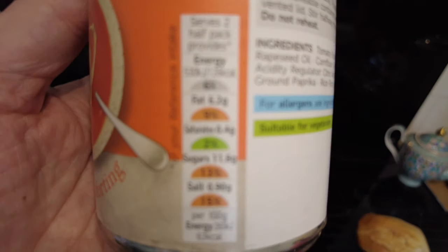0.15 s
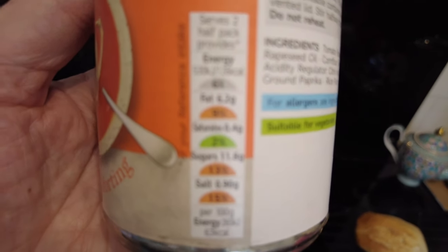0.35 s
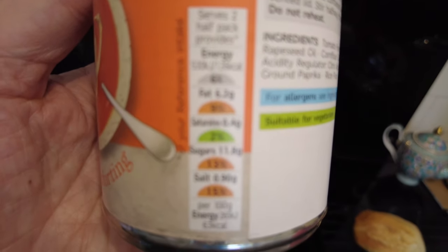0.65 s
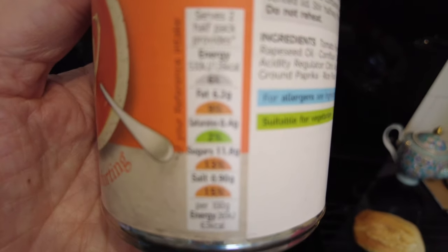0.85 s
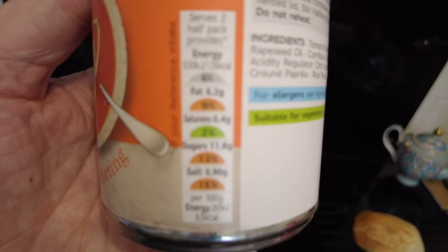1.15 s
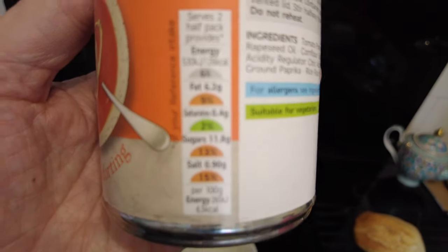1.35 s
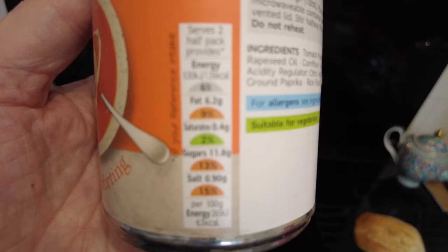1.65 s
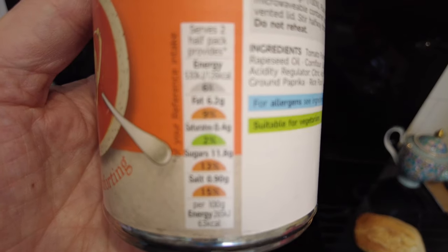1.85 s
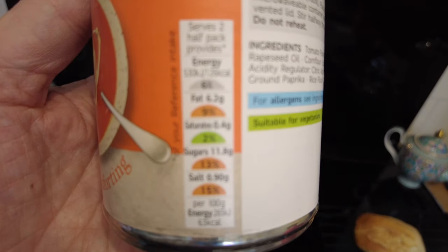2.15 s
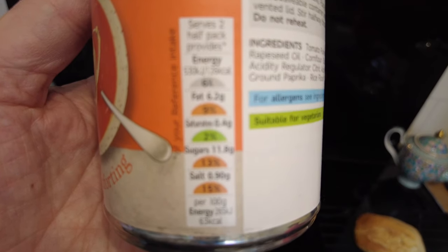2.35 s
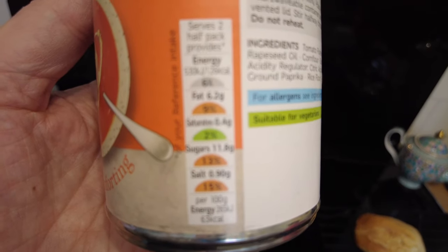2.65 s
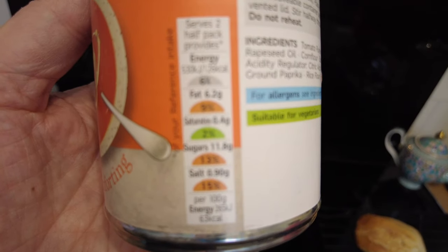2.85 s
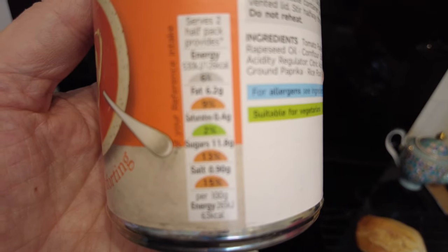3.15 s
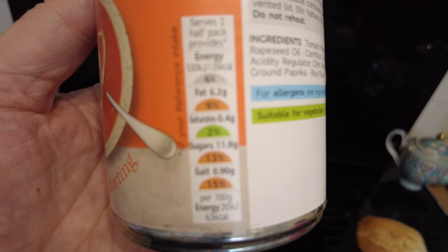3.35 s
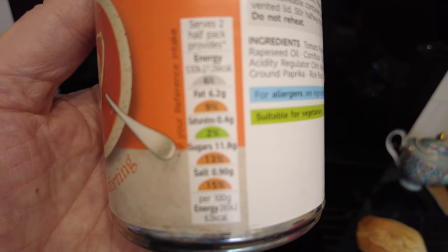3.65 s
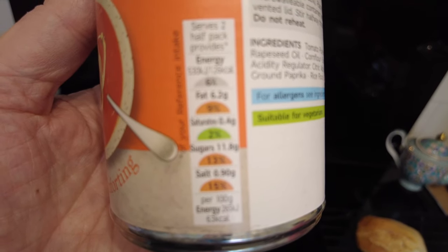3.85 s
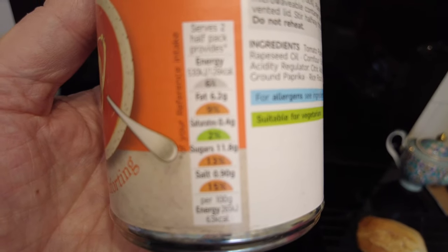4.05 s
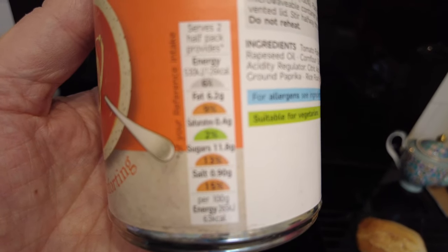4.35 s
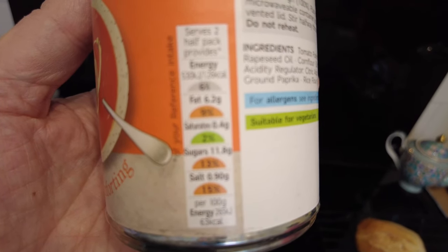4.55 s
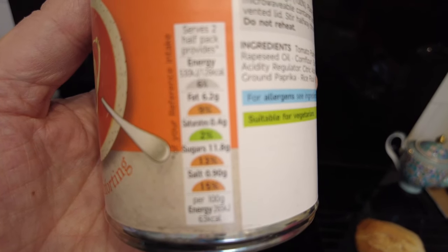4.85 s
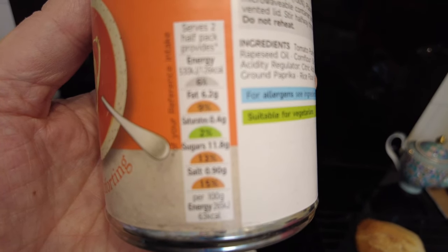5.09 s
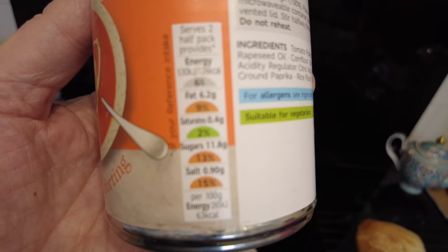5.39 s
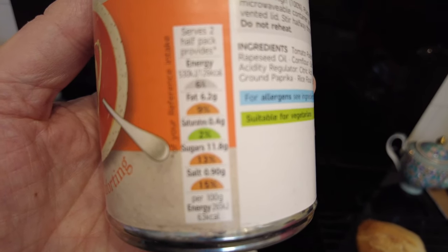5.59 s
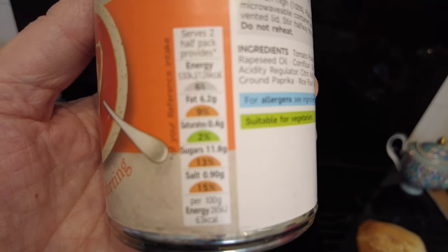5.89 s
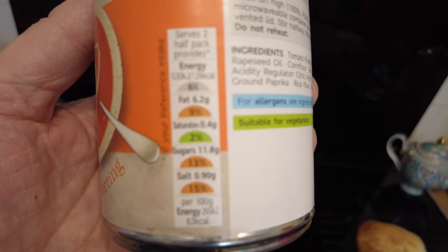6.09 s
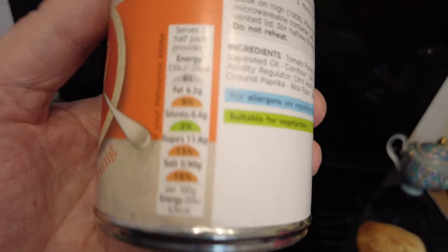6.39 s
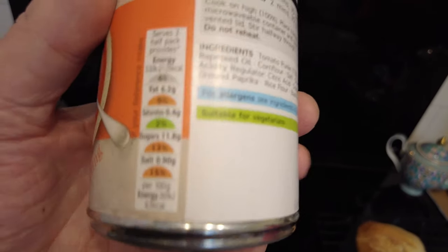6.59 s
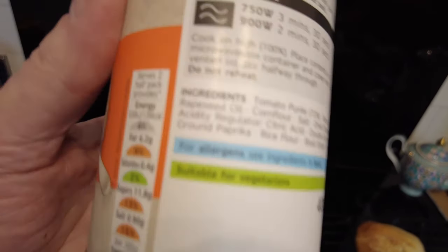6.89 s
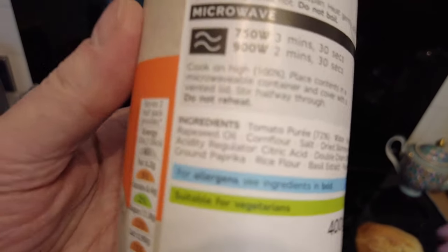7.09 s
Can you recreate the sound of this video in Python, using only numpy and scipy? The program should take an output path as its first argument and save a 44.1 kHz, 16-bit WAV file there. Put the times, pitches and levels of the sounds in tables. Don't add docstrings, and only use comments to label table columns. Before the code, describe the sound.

In a small kitchen, dull knocks and metallic clacks punctuate a constant low hum before a hand taps and rubs a labelled can.

```python
import sys
import numpy as np
from scipy import signal
from scipy.fft import rfft, irfft
from scipy.io import wavfile
from scipy.ndimage import uniform_filter1d

SR = 44100
rng = np.random.default_rng(int(sys.argv[2]) if len(sys.argv) > 2 else 0)


def volts_from_decibels(level):
    exponent = np.asarray(level, float) / 20
    return 10 ** exponent


def transcribe(signal):
    frames = np.atleast_2d(signal).T
    limited = np.clip(frames, -1, 1)
    pcm = np.round(limited * 32767).astype(np.int16)
    wavfile.write(sys.argv[1], SR, pcm)


N = 318843

# f/Hz, level/dB, t60/s
PLASTIC_MODES = [(1289, -3, .1), (1550, -1.5, .04), (1717, -5, .044), (3360, -9, .046), (4880, -14, .05),
                 (6230, -13, .08), (8030, -15, .09)]


def tin_taps():
    # t/s, blow level/dB, tilt/(dB per octave), ring level/dB, pitch f/Hz
    blows = [
        (5.798, -47, -7, 0.5, 1300),
        (6.0307, -51.5, -2, 6, 1290),
        (6.2527, -41, -9, 3, 1290),
        (6.512, -41.5, -4, -2, 1290),
        (6.62, -55, 2, 2, 1300),
        (6.815, -41.5, -5, -1, 2000),
    ]
    # f/Hz, level/dB, t60/s
    tin_modes = [(125, 14, .15), (1290, 0, .12), (2070, -8, .16), (3500, -20, .06), (4720, -17, .08),
                 (6220, -17, .08)]
    return struck(blows, tin_modes, low_slope=13.0, top_hz=7040, rise_ms=8.7, scrape_ms=12)


def drag():
    # peak t/s, level/dB, rise/s, fall/s
    lower_strokes = [
        (6.05, -75, .015, .03),
        (6.12, -61, 0.022, 0.048),
        (6.17, -60, .02, 0.045),
        (6.268, -54, 0.0068, 0.06),
        (6.63, -70, 0.016, .06),
    ]
    # peak t/s, level/dB, rise/s, fall/s
    upper_strokes = [
        (6.11, -56, .025, 0.063),
        (6.22, -63, 0.041, 0.062),
        (6.83, -56, 0.029, 0.03),
    ]
    width_hz = 10
    out, t = np.zeros(N), np.arange(N) / SR
    pole = np.exp(-np.pi * width_hz / SR)
    for hz, strokes in ((1290, lower_strokes), (2070, upper_strokes)):
        drift = signal.lfilter([1], [1, -pole], rng.standard_normal((N, 2)) @ [1, 1j])
        envelope = 1.9 + drift / np.std(drift)
        tone = (envelope * np.exp(2j * np.pi * hz * t)).real
        out += swells(strokes) * evened(tone)
    return out


def snap():
    # t/s, level/dB, f/Hz, width/ms
    releases = [
        (6.5238, -24.5, 5830, 0.26),
    ]
    out, t = np.zeros(N), np.arange(-60, 60) / SR
    for s, db, hz, width_ms in releases:
        pair = np.sin(2 * np.pi * hz * t) + 1.1 * np.sin(2 * np.pi * 1.52 * hz * t)
        add(out, s, volts_from_decibels(db) * np.exp(-(1000 * t / width_ms) ** 2) * pair)
    return out


def slide():
    strokes = [
        (6.13, -89, 0.046, .06),
        (6.5, -45.5, 0.091, 0.09),
        (6.82, -58.5, 0.021, 0.041),
        (7.01, -52.5, 0.036, 0.13),
    ]
    # f/Hz, level/(dB per Hz)
    skin_spectrum = [(1000, -18), (3000, -10), (6500, -7.5), (11500, -2.5), (14500, 1), (16000, -6.5)]
    return hiss([skin_spectrum], patchy_db=.9, likeness=.84, lean_db=3.5) * swells(strokes)


def knocks():
    # t/s, blow level/dB, tilt/(dB per octave), ring level/dB, pitch f/Hz
    blows = [(.604, -27.5, -23, -5, 342), (1.517, -30, -18, -5.5, 242), (2.091, -27.5, -11, -12, 248),
             (2.173, -26, -7, -11, 810), (2.63, -35, -12, -4, 340), (2.804, -17.5, -7, 1, 358),
             (3.085, -32.5, -14.5, -1, 330), (3.4, -15.5, -7, -3.5, 375), (3.834, -19, -6.5, -1, 340),
             (5.219, -41.5, -12, -19, 900), (5.676, -35, -13.5, 1.5, 550)]
    # f/Hz, level/dB, t60/s
    wood_modes = [(120, -4, .15), (245, -10, .08), (323, 2, .13), (420, -4, .11), (481, -5, .12),
                  (549, -4, .13), (650, -6, .11), (740, -6, .1), (851, -8, .12), (1370, -7, .09),
                  (1780, -10, .08), (2175, -10, .08), (3400, -16, .09), (4820, -22, .11)]
    return struck(blows, wood_modes, low_slope=6.7, top_hz=3340, rise_ms=3.2, scrape_ms=16)


def clacks():
    # t/s, blow level/dB, tilt/(dB per octave), ring level/dB, pitch f/Hz
    blows = [
        (.602, -30, -5, -1.5, 1350),
        (1.5954, -44.5, -2, 1, 1300),
        (1.7006, -22, -7, -2.5, 1450),
        (2.175, -25, -2, 2.5, 1350),
        (2.6105, -27, -5.5, 1.5, 1600),
        (3.3086, -32.5, 0.5, 0.5, 1400),
        (3.3725, -23.5, -6, 0, 1350),
        (4.35, -42, -7.5, 3, 2100),
        (4.9162, -43.5, -4, -13, 1500),
        (5.1638, -36.5, -3.5, -5, 2220),
    ]
    # f/Hz, level/dB, t60/s
    metal_modes = [(1292, -1, .13), (1500, 2, .055), (1780, -2, .055), (2190, -4, .08), (3290, -4, .09),
                   (3500, -6, .05), (4720, -6, .11), (4880, -5, .09), (6230, -10, .09), (7980, -11, .14),
                   (8035, -10, .12), (10060, -9, .11), (10400, -13, .06), (14630, -18, .08)]
    return struck(blows, metal_modes, low_slope=15, top_hz=14500, rise_ms=1.6, scrape_ms=5.94)


def ticks():
    # t/s, blow level/dB, tilt/(dB per octave), ring level/dB, pitch f/Hz
    blows = [(.2424, -38, -8, -7, 1320), (.275, -41, -5, -0.5, 1340), (.561, -56.5, -14, 8, 1400),
             (.572, -44.5, -8, -3, 1600), (1.4209, -48, -2, 0, 1400), (1.5795, -39, -4, -8, 1400),
             (1.6353, -32, -4, -17, 1350), (1.7748, -37, -4.5, -17, 1500), (2.1274, -32.5, -3.5, -3, 1550),
             (2.44, -50, -1, 1, 1500), (2.48, -44.5, -7, 2, 1530), (2.7303, -50.5, -2.5, 0, 1400),
             (3.7728, -41.5, -8, -7, 1600), (4.6867, -49.5, -15, 4, 1410), (4.9395, -39.5, -13, 3, 1560),
             (4.9795, -35, -5, 1.5, 1560), (6.1081, -43, 0, -4, 1400), (6.1596, -44, -7, 1, 1390)]
    return struck(blows, PLASTIC_MODES, low_slope=23.0, top_hz=15700, rise_ms=1.0, scrape_ms=17.6)


def crackles():
    # t/s, blow level/dB, tilt/(dB per octave), ring level/dB
    bursts = [(.0133, -46, -.5, -12), (.42, -45, 0.5, -11), (1.1578, -45.5, 2, -13),
              (1.1999, -42.5, 0.5, -10), (1.2678, -51, 4, -6), (1.339, -47, 1, -2), (1.4706, -48, 5, -4),
              (3.034, -50, 1, -14), (3.1892, -48.5, 1, -3), (3.2828, -41, -4, -13), (3.6395, -44, -.5, -10),
              (3.6553, -36, -0.5, -12), (4.2094, -47.5, -1.5, -13), (5.5139, -48.5, 0.5, -16),
              (5.569, -49, 6, -11), (5.6514, -47, 0, -1), (6.0242, -49, 0, -3), (6.0774, -44.5, 1, -3),
              (6.1394, -45, 6, -3)]
    bursts = [(*burst, 1370) for burst in bursts]
    return struck(bursts, PLASTIC_MODES, low_slope=23.0, top_hz=17500, rise_ms=1.4, scrape_ms=12.4)


def struck(blows, modes, low_slope, top_hz, rise_ms, scrape_ms):
    out, t = np.zeros(N), np.arange(16384) / SR
    hz = np.fft.rfftfreq(len(t), 1 / SR)
    f, mode_db, t60 = np.transpose(modes)
    dying = np.exp(2j * np.pi * f[:, None] * t) * volts_from_decibels(-60 * t / t60[:, None])
    rise = 1 - np.exp(-1000 * t / rise_ms)
    fade_in = np.minimum(t * 2000 / rise_ms, 1) ** 2
    for s, blow_db, tilt, ring_db, pitch_hz in blows:
        grit, lumps = rng.standard_normal((2, len(t)))
        spot = rng.standard_normal((2, len(modes)))
        lumps = evened(uniform_filter1d(lumps, size=90))
        scrape = rfft(grit * volts_from_decibels(4.1 * lumps) * np.exp(-1000 * t / scrape_ms) * rise)
        octaves = np.log2((hz + 1) / pitch_hz)
        slope_db = tilt * np.maximum(octaves, 0) + low_slope * np.minimum(octaves, 0)
        colour = volts_from_decibels(slope_db) / (1 + (hz / top_hz) ** 4)
        direct = irfft(scrape * colour / np.sqrt(uniform_filter1d(abs(scrape) ** 2, size=90)))
        above = np.log2(f / pitch_hz)
        mode_slope = np.where(above > 0, tilt + 4.5, low_slope)
        strength_db = mode_db + 1.2 * spot[0] + .45 * mode_slope * above
        ring = ((volts_from_decibels(strength_db) * np.exp(3j * spot[1])) @ dying).imag
        ring = ring * rise * volts_from_decibels(2.2 * lumps)
        sound = direct / np.std(direct[:900]) + volts_from_decibels(ring_db) * ring / np.std(ring[:900])
        add(out, s, volts_from_decibels(blow_db - 11.5) * (sound * fade_in)[:14000])
    return out


def kitchen(x, wet_db):
    # f/Hz, t60/s
    decay_times = [(100, 0.3), (500, 0.3), (2000, 0.22), (6000, 0.2), (15000, 0.16)]
    echoes, first = np.zeros((2, SR // 2)), np.zeros(SR // 2)
    at = np.arange(400, SR // 2 - 20, 20) + rng.integers(0, 20, (2, (SR // 2 - 401) // 20))
    np.put_along_axis(echoes, at, rng.choice([-1., 1.], at.shape), 1)
    first[256] = 1
    hz, t, z = signal.stft(echoes, SR, nperseg=512)
    decay = volts_from_decibels(-60 * t / read(decay_times, hz)[:, None])
    tail = signal.istft(ports(hz, *z, likeness=0.83) * decay, SR, nperseg=512)[1]
    spike = signal.stft(first, SR, nperseg=512)[2]
    direct = signal.istft(ports(hz, spike, spike, likeness=3.3), SR, nperseg=512)[1]
    response = direct + volts_from_decibels(wet_db) * tail / np.linalg.norm(tail[0])
    return signal.fftconvolve(x[None], response, axes=1)[:, 256:N + 256]


def stir():
    gestures = [
        (.52, -69, .2, 0.2),
        (1.6, -61, 0.29, 0.19),
        (2.62, -58.5, 0.11, 0.12),
        (3.3, -54, 0.083, 0.17),
        (3.81, -59.5, 0.04, 0.027),
        (5.11, -61.5, 0.1, 0.094),
        (5.68, -65.5, 0.13, 0.21),
        (6.22, -57.5, 0.097, 0.072),
        (6.9, -59, 0.24, 0.33),
    ]
    # f/Hz, level/(dB per Hz)
    cloth_spectrum = [(350, -12.5), (600, 0.5), (1570, -7), (2370, -14), (2870, -8.5), (3680, -13),
                      (12500, -22), (16000, -19.5)]
    rest_db = -62
    return (volts_from_decibels(rest_db) + swells(gestures)) * hiss([cloth_spectrum], patchy_db=3.0, likeness=1.0, lean_db=1.1)


def fridge():
    # t/s, level/dB
    hum_levels = [(0.05, -34), (0.41, -29), (0.54, -31), (2.4, -31.5), (2.5, -32.5), (3.81, -30.5),
                  (3.85, -33), (3.9, -31), (5.31, -31), (6.04, -32.5), (6.36, -30.5), (7.15, -32)]
    # f/Hz, width/Hz, level/dB
    buzz_tones = [
        (200.9, 12, -56),
        (242.8, 16, -59.5),
        (316.7, 13.7, -65.5),
        (376.3, 12, -66),
        (496, 17.4, -66),
        (581, 53, -81.5),
        (15690, 30, -95),
    ]
    hum_hz, left_lag_rad, left_lean_db = 100.2, 0.33, -0.1
    t = np.arange(N) / SR
    level_db = np.interp(t, *np.transpose(hum_levels))
    hum = np.sqrt(2) * volts_from_decibels(level_db) * np.exp(2j * np.pi * hum_hz * t)
    left = hum * volts_from_decibels(left_lean_db) * np.exp(-1j * left_lag_rad)
    out = np.array([left.real, hum.real])
    for hz, width_hz, db in buzz_tones:
        pole = np.exp(-np.pi * width_hz / SR)
        drift = signal.lfilter([1], [1, -2 * pole, pole * pole], rng.standard_normal((N, 2)) @ [1, 1j])
        out = out + volts_from_decibels(db) * evened((drift * np.exp(2j * np.pi * hz * t)).real)
    return out


def room_air():
    # f/Hz, level/(dB per Hz)
    rumble_spectrum = [(8, 2), (22, -1.5), (42, -14), (70, -16), (120, -11.5), (165, -29.5), (230, -49),
                       (400, -80)]
    # f/Hz, level/(dB per Hz)
    air_spectrum = [(120, -28.5), (300, -22.5), (520, -28.5), (1000, -43), (1400, -41.5), (2500, -48.5),
                    (12000, -64.5), (13500, -98)]
    return volts_from_decibels(-38) * hiss([rumble_spectrum, air_spectrum], patchy_db=2.1, likeness=1.53, lean_db=-0.6)


def hiss(spectra, patchy_db, likeness, lean_db):
    frames, hz = N // 512 + 5, np.fft.rfftfreq(2048, 1 / SR)
    a, b, c, d, patches = rng.standard_normal((frames, 1025, 5)).T
    patches = uniform_filter1d(patches, size=20, axis=0)
    patches = evened(uniform_filter1d(patches, size=8, axis=1))
    power = sum(volts_from_decibels(read(spectrum, hz)) ** 2 for spectrum in spectra)
    colour = np.sqrt(power)[:, None]
    z = ports(hz, a + 1j * b, c + 1j * d, likeness) * colour * volts_from_decibels(patchy_db * patches)
    noise = signal.istft(z, nperseg=2048, noverlap=1536)[1][:, :N]
    return evened(noise) * volts_from_decibels([[lean_db / 2], [-lean_db / 2]])


def ports(hz, shared, other, likeness):
    # f/Hz, likeness/(0 to 1), left minus right level/dB, left phase lag/rad
    port_table = [(50, 0.7, 2.5, 0.22), (150, 0.96, 0, 0.37), (525, 0.44, 2, 1.2), (947, 0.07, 2, 3.23),
                  (1620, 0.42, -0.5, 7.14), (4860, 0.3, -3.2, 8.19), (7920, 0, -3.3, 11.6),
                  (12430, 0, -3, 20.76)]
    f, *columns = np.transpose(port_table)
    same, lean_db, lag = (np.interp(np.log(hz + 1), np.log(f), c)[:, None] for c in columns)
    same = np.clip(likeness * same, 0, 1)
    right = (same * shared + np.sqrt(1 - same ** 2) * other) * np.exp(1j * lag)
    return np.array([shared * volts_from_decibels(lean_db / 2), right / volts_from_decibels(lean_db / 2)])


def swells(gestures):
    t = np.arange(N) / SR
    out = np.zeros(N)
    for s, db, rise, fall in gestures:
        width = np.where(t < s, rise, fall)
        out += volts_from_decibels(db) * np.exp(-.5 * ((t - s) / width) ** 2)
    return out


def evened(x):
    return x / np.sqrt(np.mean(x ** 2) + 1e-20)


def read(points, hz):
    f, value = np.transpose(points)
    return np.interp(np.log(hz + 1), np.log(f + 1), value)


def add(mix, s, sound):
    part = mix[round(s * SR):][:len(sound)]
    part += sound[:len(part)]


def scene():
    near = kitchen(tin_taps() + snap() + drag(), wet_db=-15.0)
    around = kitchen(knocks() + clacks() + ticks() + crackles(), wet_db=-3.5)
    return near + around + slide() + stir() + fridge() + room_air()


def roll_off(x):
    return signal.sosfilt(signal.butter(12, 15860, fs=SR, output="sos"), x)


def record(dry):
    lowpass = signal.firwin(1023, 15860, window=("kaiser", 9), fs=SR)
    limited = signal.oaconvolve(dry, lowpass[None], "same")
    return roll_off(limited)


dry = scene()
out = record(dry)
transcribe(out)
```